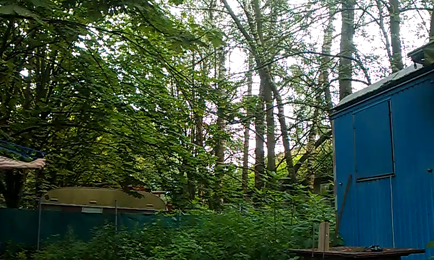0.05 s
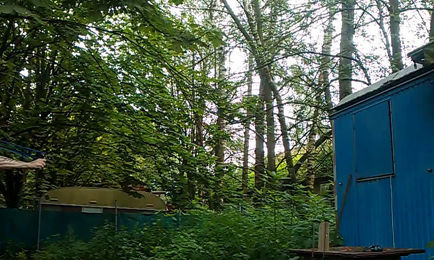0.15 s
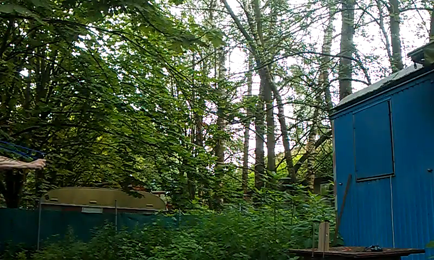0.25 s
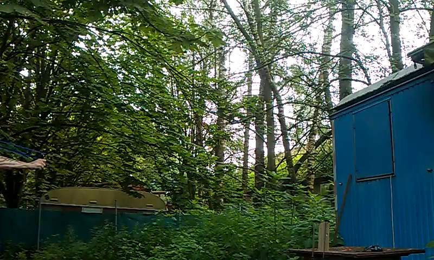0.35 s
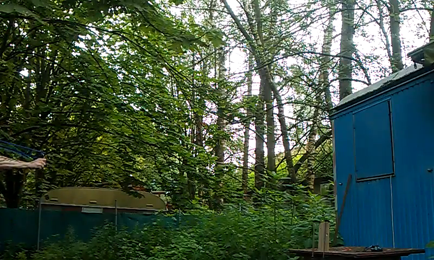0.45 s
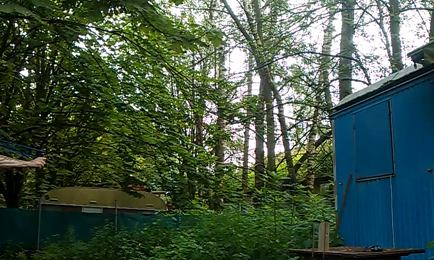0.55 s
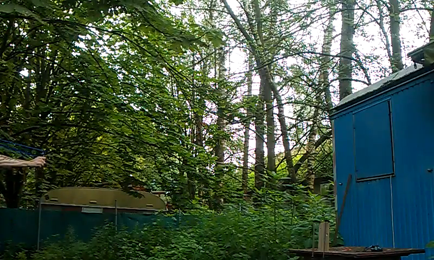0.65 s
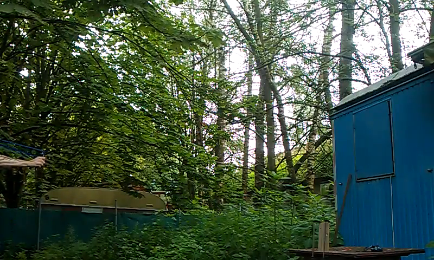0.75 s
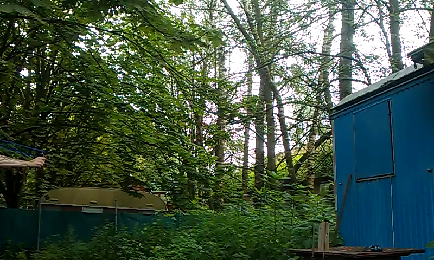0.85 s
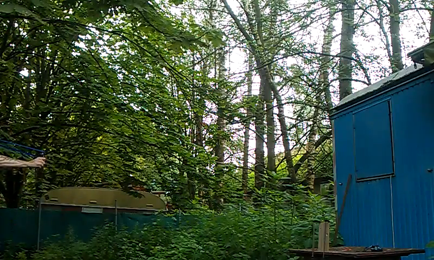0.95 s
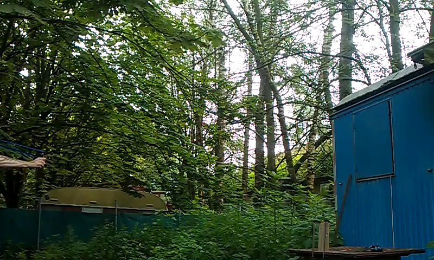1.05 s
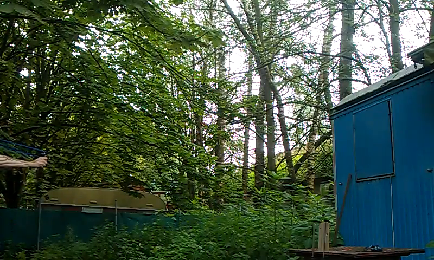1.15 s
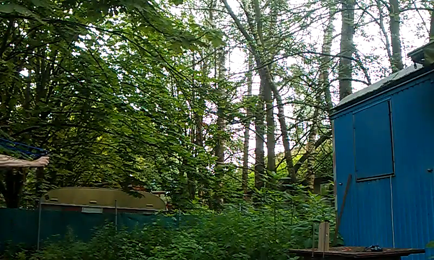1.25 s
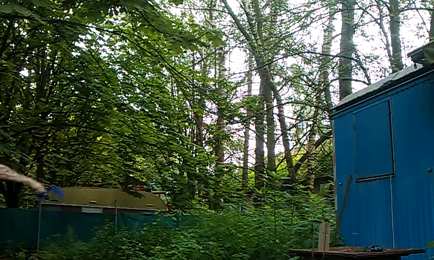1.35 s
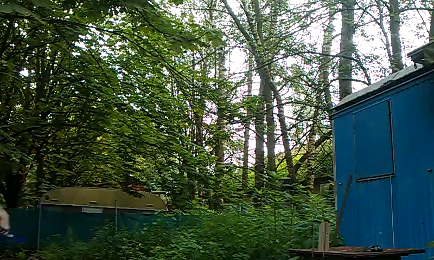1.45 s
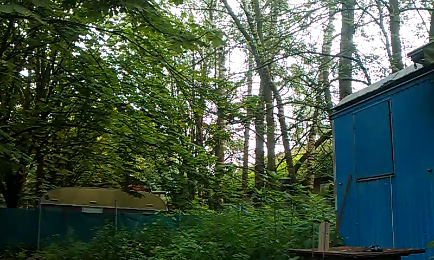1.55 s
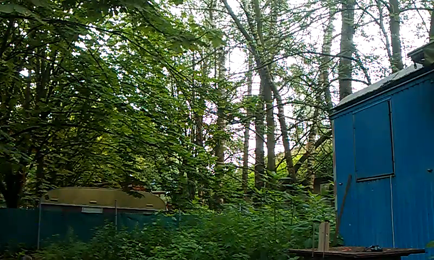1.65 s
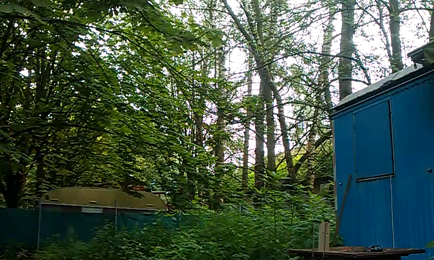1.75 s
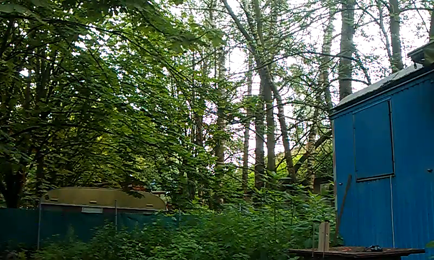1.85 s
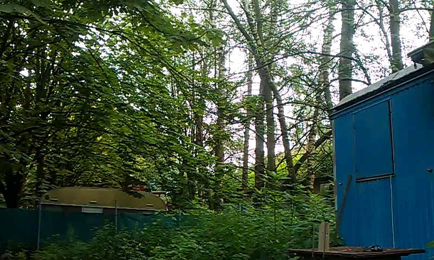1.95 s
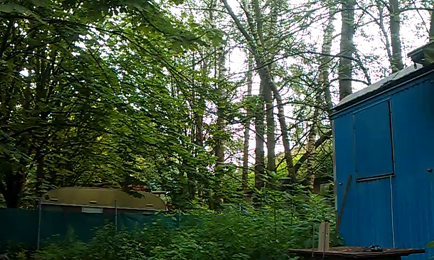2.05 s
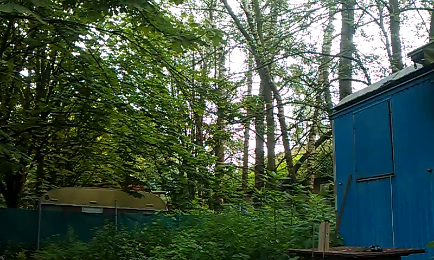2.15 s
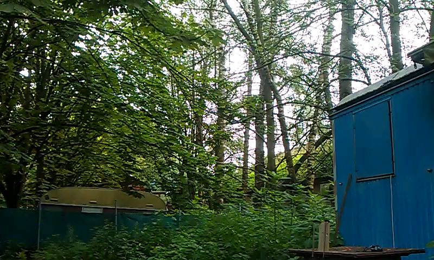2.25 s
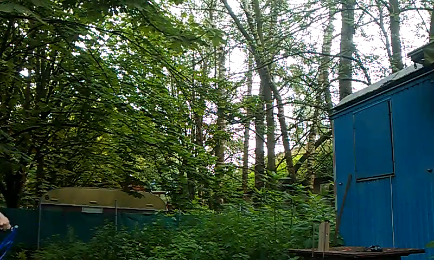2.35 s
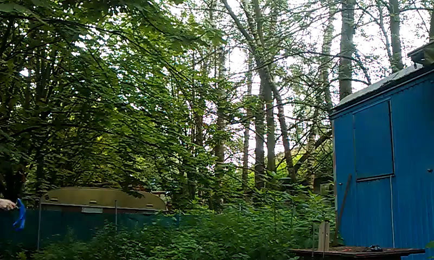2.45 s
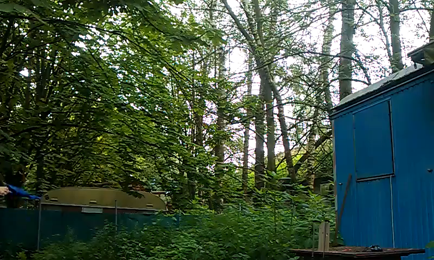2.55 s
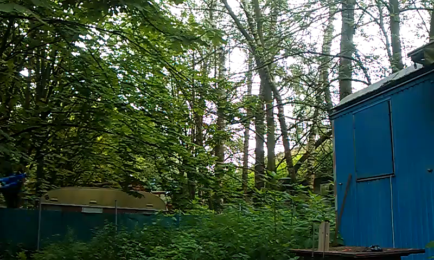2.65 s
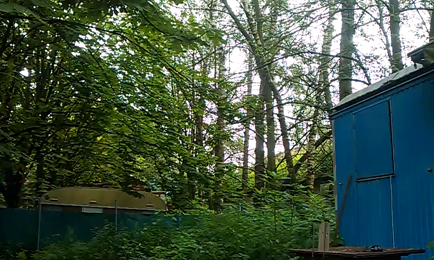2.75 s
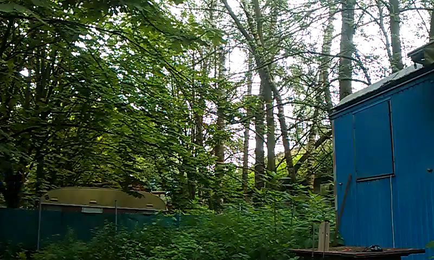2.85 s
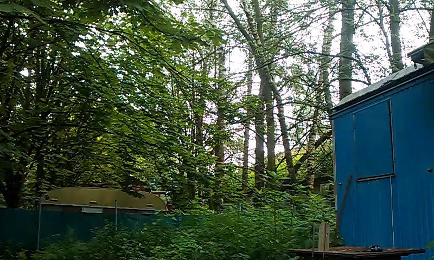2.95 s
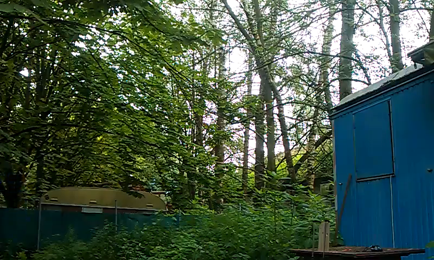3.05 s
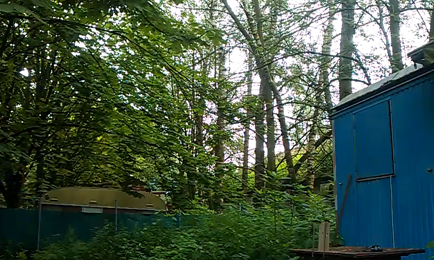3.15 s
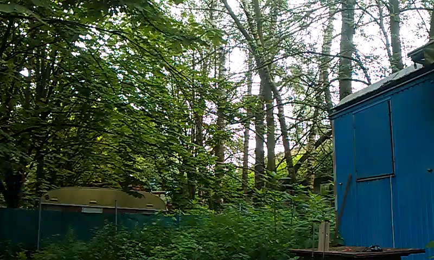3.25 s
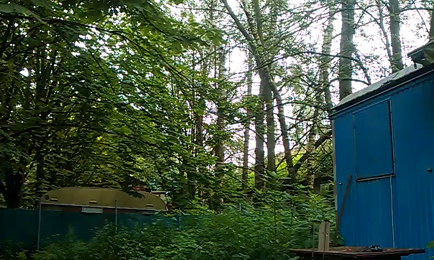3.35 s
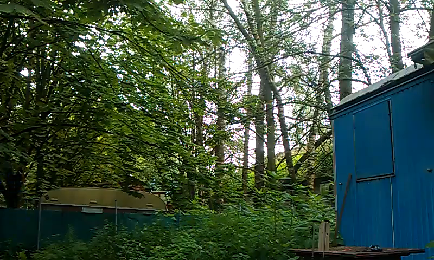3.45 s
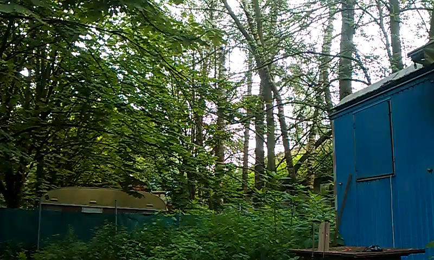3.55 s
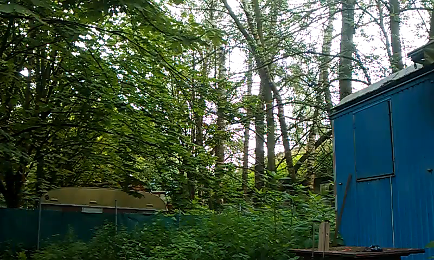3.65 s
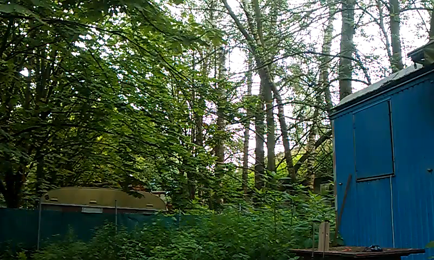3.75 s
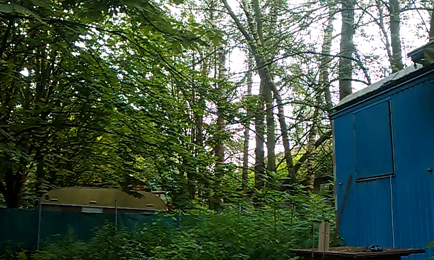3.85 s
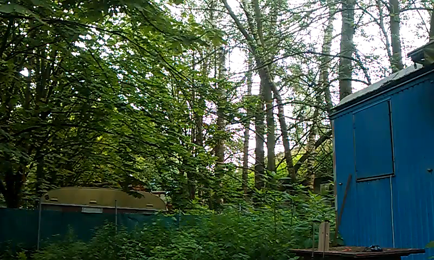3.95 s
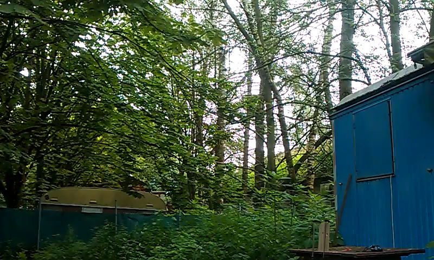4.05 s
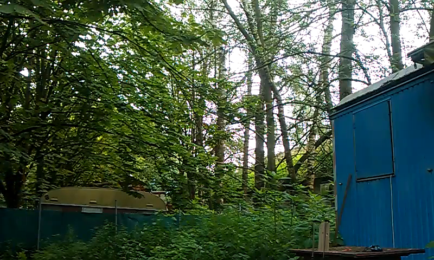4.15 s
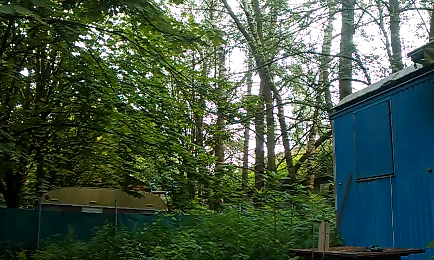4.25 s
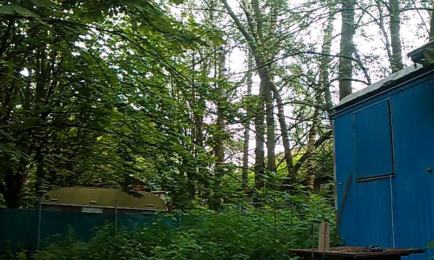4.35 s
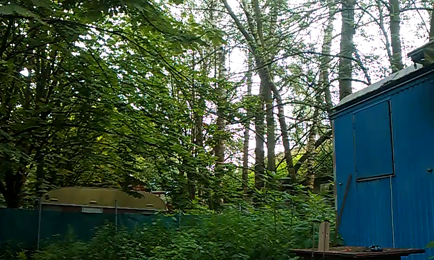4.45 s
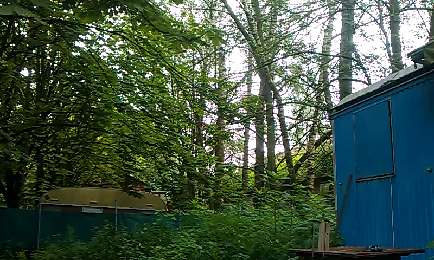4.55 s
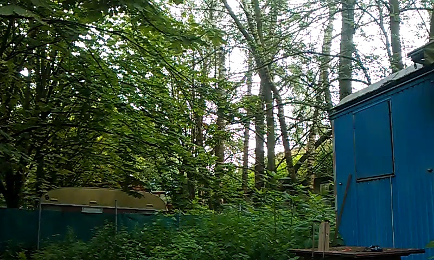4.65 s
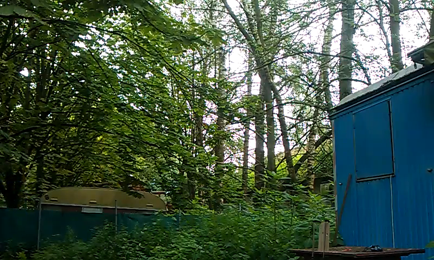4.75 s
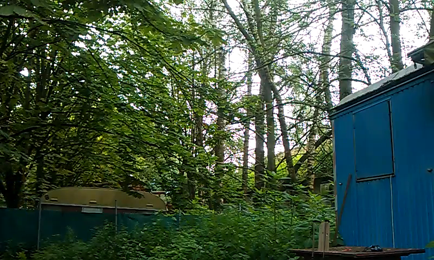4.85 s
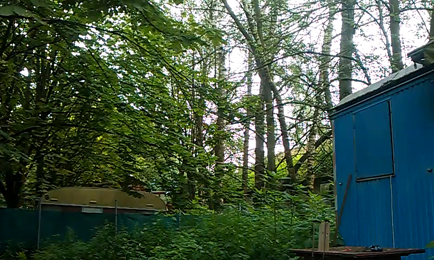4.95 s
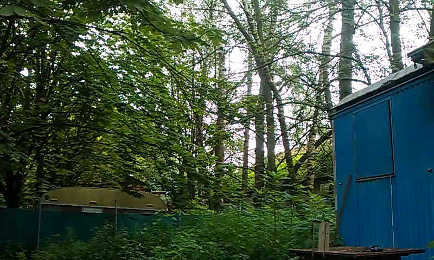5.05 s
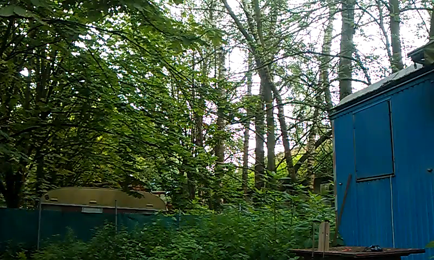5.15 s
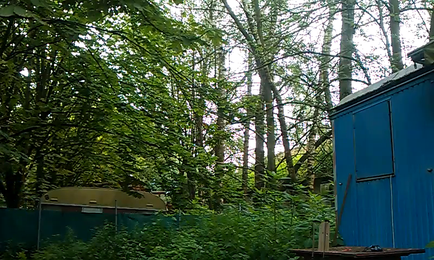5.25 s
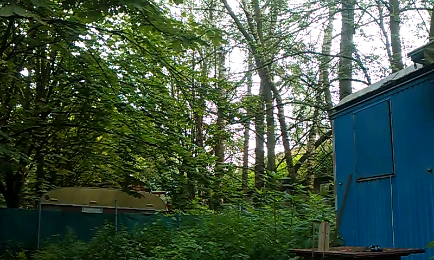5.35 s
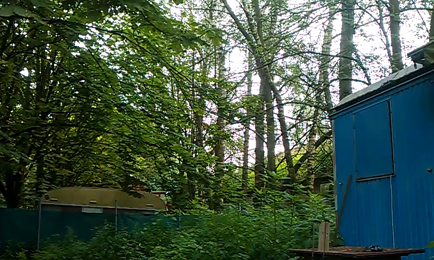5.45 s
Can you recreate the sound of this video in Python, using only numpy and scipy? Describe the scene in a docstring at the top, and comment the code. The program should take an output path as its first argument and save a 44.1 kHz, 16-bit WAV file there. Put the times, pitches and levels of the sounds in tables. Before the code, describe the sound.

Quiet birdsong and soft hiss, then one sharp rubbery slingshot snap with a tearing rush of leaves, a woodland echo, and more chirps.

```python
"""Thin bird whistles scoop and trill among the trees, over a noise bed of far rumble, soft air and high hiss.
At 1.4 s a slingshot is fired: its bands swish as fluttering noise, slap the fork with cracks, knocks and
decaying sine rings, and the shot tears into the leaves as a spray of ticks, with knocks of its own.
A limiter squeezes the shot and the trees echo it as a decaying noise tail. The far calls carry on, and at
3.2 s a bird close by chips with two sliding sine voices, while the rumble and air slowly swell."""
import sys
import numpy as np
from scipy import signal
from scipy.fft import rfft, irfft, next_fast_len
from scipy.io import wavfile
from scipy.ndimage import map_coordinates

SR = 44100
rng = np.random.default_rng(int(sys.argv[2]) if len(sys.argv) > 2 else 0)


def unload_audio(sound):
    """Save the sound as a 16-bit wav file, at the path given as the first command line argument."""
    columns = np.transpose(np.atleast_2d(sound))
    # keep every value between -1 and 1, then stretch to whole-number steps
    steps = np.round(np.clip(columns, -1, 1) * 32767)
    wavfile.write(sys.argv[1], SR, steps.astype(np.int16))


N = 242550
TIME = np.arange(N) / SR

# blows of the bands, then of the shot on twigs and wood:
# (t/s, crack level/dB, knock level/dB, knock f/Hz, knock t60/s)
BLOW_HITS = [(1.4154, -16, -24.5, 432, .045), (1.4526, -9.5, -19.5, 760, .089),
             (1.458, -19, -22, 1410, 0.071), (1.476, -20, -22.5, 750, 0.031), (1.531, -40, -27, 1580, .34),
             (1.5837, -14.5, -19.5, 636, .065), (1.742, -50, -47, 296, 0.078)]


def amp(db):
    """Decibels to gain."""
    return 10 ** (np.asarray(db) / 20)


def unit(x):
    """Scale to rms 1."""
    return x / np.sqrt(np.mean(x ** 2) + 1e-20)


def along(points, hz):
    """Read (f/Hz, value) points on a log frequency axis."""
    f, v = np.transpose(points)
    return np.interp(np.log(hz + 1), np.log(f), v)


def wobble(rate):
    """A smooth random curve with rate knots a second."""
    knots = rng.standard_normal(int(N * rate / SR) + 4)
    return map_coordinates(knots, [TIME * rate])


def filtered(x, response):
    """Shape the spectrum of x by a response given as a function of frequency."""
    size = next_fast_len(N + SR // 2)
    gain = response(np.fft.rfftfreq(size, 1 / SR))
    return irfft(rfft(x, size) * gain, size)[..., :N]


def coloured(x, colour):
    """Filter x by a colour curve, then scale to rms 1."""
    return unit(filtered(x, lambda hz: amp(along(colour, hz))))


def noise(colour):
    """Fresh coloured noise of rms 1."""
    return coloured(rng.standard_normal(N), colour)


def fade(t, t60):
    """Exponential decay, 60 dB down after t60 seconds."""
    return np.exp(-np.log(1000) * t / np.maximum(t60, 1e-3))


def burst(t, colour, t60):
    """Coloured noise that starts at about rms 1 and dies away."""
    decay = fade(t, t60)
    decaying_noise = unit(decay * noise(colour)[:len(t)])
    return decaying_noise * np.sqrt(np.mean(decay ** 2))


def envelope(start, attack, hold, fall_db_per_s, power=1, sag_db_per_s=0):
    """Gain that grows as a power of time, holds with an optional sag, then dies away."""
    t = np.maximum(TIME - start, 0)
    rise = np.clip(t / attack, 1e-9, 1) ** power
    sag_db = sag_db_per_s * np.maximum(t - attack, 0)
    fall_db = fall_db_per_s * np.maximum(t - attack - hold, 0)
    return rise * amp(-sag_db - fall_db)


def woods(x, build, stretch):
    """Trunks and leaves scatter sound back: the echo builds up, and its highest treble dies first."""
    # decay by band, before the stretch: (f/Hz, t60/s)
    wood_decay = [(100, 0.79), (500, 0.59), (1500, 0.98), (4500, 0.77), (8000, 0.67), (11000, 0.57),
                  (15000, 0.11)]
    hz, t, z = signal.stft(rng.standard_normal(SR), SR, nperseg=256)
    decay = fade(t, stretch * along(wood_decay, hz)[:, None])
    build_up = 1 - np.exp(-t / build)
    tail = signal.istft(z * decay * build_up, SR)[1]
    tail = tail / np.linalg.norm(tail)
    return signal.fftconvolve(x, tail)[:len(x)]


def background():
    """A far rumble and the soft rush of air creep up as the breeze freshens, under a nearly steady hiss."""
    # spectra of the three layers, relative density per Hz: (f/Hz, level/dB)
    rumble_colour = [(15, -33), (32, -1), (48, -6.5), (60, 0.5), (74, 2.5), (88, -6), (110, -19),
                     (250, -34.5)]
    air_colour = [(30, -25), (120, -3), (200, -6), (350, -4.5), (550, -2), (800, -2), (1050, 0.5),
                  (1350, -3), (1800, -3), (2300, -9), (4000, -11), (9000, -26)]
    hiss_colour = [(1000, -14), (3000, -14.5), (5000, -9.5), (6200, -9.5), (7200, -5.5), (8400, -0.5),
                   (9200, -5.5), (10000, -11.5), (11500, -18), (15500, -27.5)]
    # starting level in dB + growth in dB/s + random drift in dB
    rumble_db = -64 + 0.62 * TIME + 0.34 * wobble(5.7)
    air_db = -55 + 0.29 * TIME + 0.21 * wobble(4.63)
    hiss_db = -54.5 + 0.1 * wobble(4.1)
    rumble = amp(rumble_db) * noise(rumble_colour)
    air = amp(air_db) * noise(air_colour)
    hiss = amp(hiss_db) * noise(hiss_colour)
    return rumble + air + hiss


def faint_calls(count=8):
    """Fainter birds farther off call at random, once in each equal slot; same columns as the clear calls."""
    length_s, centre_hz, spread_hz, trill_hz, level_db = .06, 7260, 500, 180, -60.5
    found = []
    for slot, (when, pitch) in enumerate(rng.random((count, 2))):
        start_s = (slot + when) * N / SR / count
        pitch_hz = centre_hz + spread_hz * (2 * pitch - 1)
        found.append((start_s, length_s, pitch_hz, trill_hz, level_db))
    return found


def far_birds(knots_per_s=420, scoop=0.052, scoop_s=0.00528, direct_db=-1.5, echo_db=-1):
    """Thin whistles that scoop up to their pitch, slide and trill unevenly; each perch has its own echo."""
    # clear calls among the trees, level before the direct and echo gains:
    # (t/s, length/s, pitch f/Hz, trill scale/Hz, level/dB)
    clear_calls = [(.025, 0.057, 5120, 110, -54), (0.282, 0.048, 5080, 90, -52.5),
                   (0.712, .09, 7390, 300, -48), (0.792, 0.068, 6400, 300, -60),
                   (0.922, 0.076, 7020, 130, -57), (1.986, .04, 6970, 160, -50),
                   (2.161, 0.07, 8210, 281, -48.5), (2.56, 0.078, 7540, 400, -54),
                   (2.663, .063, 7710, 820, -48), (2.686, 0.055, 4315, 70, -49.5),
                   (2.815, .09, 6850, 70, -57), (2.894, 0.074, 7760, 40, -53),
                   (3.336, 0.042, 7830, 90, -50), (3.383, .16, 7200, 110, -53.5),
                   (3.617, 0.069, 6920, 230, -46.5), (4.08, .06, 7960, 300, -47.5),
                   (4.14, .08, 6900, 150, -57.5), (4.407, 0.065, 7550, 347, -52),
                   (4.486, .048, 7770, 390, -42.5), (4.675, 0.038, 7930, 450, -47.5),
                   (4.795, .05, 8500, 400, -51.5), (5.175, .05, 7040, 130, -56)]
    rise_hz, drop_per_trill = 169, 1.405  # a pure note rises a little; the harder the trill, the more it falls
    out = np.zeros(N + SR)
    for start_s, length_s, pitch_hz, trill_hz, level_db in clear_calls + faint_calls():
        u = np.linspace(0, 1, max(round(length_s * SR), 2))  # progress through the call
        t = u * length_s
        waver = map_coordinates(rng.uniform(-1.5, 1.5, 256), [t * knots_per_s], mode="mirror")
        slide_hz = rise_hz - drop_per_trill * trill_hz
        sliding_hz = pitch_hz + slide_hz * (u - .5)
        hz = sliding_hz * (1 - scoop * np.exp(-t / scoop_s)) + trill_hz * waver
        swell = np.sqrt(2 * np.abs(np.sin(np.pi * u)))
        whistle = amp(level_db) * swell * np.sin(2 * np.pi * np.cumsum(hz) / SR)
        note = np.pad(whistle, (0, SR - len(u)))  # room for the echo
        echo = unit(woods(note, build=0.0043, stretch=1.0)) * note.std()
        out[round(start_s * SR):][:SR] += amp(direct_db) * note + amp(echo_db) * echo
    return out[:N]


def near_bird(apart_hz=570, second_db=1.5, wall_delay_s=0.024, wall_db=-12, echo_db=-11):
    """A fast chip scoops up, then sags; the two sides of the syrinx beat against each other."""
    start_s, level_db = 3.196, -32
    aim_hz, scoop_hz, scoop_s, sag_hz_per_s = 8750, 4690, .0034, 13200  # the sag keeps it short of its aim
    t = np.maximum(TIME - start_s, 0)
    hz = aim_hz - scoop_hz * np.exp(-t / scoop_s) - sag_hz_per_s * t
    phase = 2 * np.pi * np.cumsum(hz) / SR
    second_voice = amp(second_db) * np.sin(phase - 2 * np.pi * apart_hz * t)
    voices = np.sin(phase) + second_voice
    swell = envelope(start_s, attack=0.0068, hold=.012, fall_db_per_s=1100, power=1.9)
    chip = amp(level_db) * swell * voices
    wall = amp(wall_db) * np.roll(chip, round(wall_delay_s * SR))  # off the shed
    return chip + wall + amp(echo_db) * woods(chip, build=.004, stretch=1.1)


def foliage(ticks_per_s=2500, spread_db=4, level_db=-20.5):
    """The shot meets ever thicker leaves, then stops: a dense spray of tiny ticks of uneven size."""
    # spectrum of the torn leaves, relative density per Hz: (f/Hz, level/dB)
    leaf_colour = [(60, -26), (200, -21), (450, -16), (800, -8.5), (1500, -5), (2050, -6), (2700, -6.5),
                   (4400, 0.5), (5600, 2), (7000, 0.5), (9100, -0.5), (10200, -18), (13000, -29),
                   (15500, -42)]
    tearing = envelope(1.438, attack=.21, hold=.04, fall_db_per_s=219, power=1.3)
    struck = rng.random(N) < ticks_per_s / SR
    sizes = rng.choice([-1, 1], N) * amp(spread_db * rng.standard_normal(N))
    return amp(level_db) * tearing * coloured(struck * sizes, leaf_colour)


def fork_ring(level_db=-9.5, attack_s=0.00047):
    """The first blow rings the fork with its slack bands: a sum of decaying sine modes."""
    # modes, level relative to the ring's own gain: (f/Hz, level/dB, t60/s)
    fork_modes = [(419, -10.5, 0.055), (556, -13.5, 0.056), (1590, -2, 0.033), (2290, -8, 0.045),
                  (2760, 2.5, 0.022), (2970, -1.5, 0.022), (3740, -7, 0.043), (5530, -4, 0.023)]
    out, t = np.zeros(N), np.arange(SR // 3) / SR
    ring = sum(amp(db) * fade(t, t60) * np.sin(2 * np.pi * hz * t) for hz, db, t60 in fork_modes)
    onset = 1 - np.exp(-t / attack_s)
    out[round(BLOW_HITS[0][0] * SR):][:len(t)] += amp(level_db) * onset * ring
    return out


def blows(crack_t60_s=0.032):
    """Each blow is a sharp noise crack and a dull noise knock at the pitch of what is hit."""
    # spectrum of a crack, relative density per Hz: (f/Hz, level/dB)
    crack_colour = [(100, -24), (700, 5), (1400, -17), (2000, -13), (3000, 7.5), (4500, 13), (6000, -1),
                    (8000, -8), (11000, -17), (15500, -20)]
    # spectrum of a knock, relative density per Hz: (multiple of its pitch, level/dB)
    knock_colour = [(.06, -33), (.25, -15.5), (.65, -6.5), (1, 3.5), (1.3, -7), (2.2, -13.5), (4, -11.5),
                    (12, -55)]
    out, t = np.zeros(N), np.arange(SR // 3) / SR
    for start_s, crack_db, knock_db, knock_hz, knock_t60_s in BLOW_HITS:
        crack = amp(crack_db) * burst(t, crack_colour, crack_t60_s)
        pitched_colour = [(multiple * knock_hz, db) for multiple, db in knock_colour]
        knock = amp(knock_db) * burst(t, pitched_colour, knock_t60_s)
        out[round(start_s * SR):][:len(t)] += crack + knock
    return out


def bands(level_db=-16.5, flutter_db=1.25, flutter_knots_per_s=400):
    """Rubber bands are let go, speed up, flap on with a quick flutter while weakening, and come to rest."""
    # spectrum of air rushing past bands and pouch, relative density per Hz: (f/Hz, level/dB)
    swish_colour = [(40, -37), (200, -26), (450, -21), (800, -13), (1550, -10.5), (2000, -14), (2750, -6),
                    (6000, -8), (7100, -2.5), (7900, -0.5), (8700, 3), (9400, -4), (10300, -9.5),
                    (12500, -12), (15500, -21)]
    swing = envelope(1.402, attack=.027, hold=.21, fall_db_per_s=238, power=1.25, sag_db_per_s=10)
    flutter = amp(level_db + flutter_db * wobble(flutter_knots_per_s))
    return swing * flutter * noise(swish_colour)


def scene():
    """The shot and its echo, birds and background, alike in both channels."""
    shot = bands() + blows() + fork_ring() + foliage()
    echo = unit(woods(shot, build=0.017, stretch=0.95)) * shot.std()
    yard = shot + amp(-9) * echo + near_bird() + far_birds() + background()
    return np.array([yard, yard])


def record(dry, ceiling_db=-17.5, window_s=0.0019, top=0.37, hardness=3.1, top_hz=15800):
    """A quick rms limiter holds the shot down, first peaks slip past and soft-clip, and a steep low-pass ends it."""
    keep = np.exp(-1 / (window_s * SR))
    power = signal.lfilter([1 - keep], [1, -keep], dry ** 2)
    over = np.sqrt(np.abs(power)) / amp(ceiling_db)
    held = dry / np.maximum(over, 1)
    clipped = held / (1 + np.abs(held / top) ** hardness) ** (1 / hardness)
    return filtered(clipped, lambda hz: 1 / (1 + (hz / top_hz) ** 400))


dry = scene()
out = record(dry)
unload_audio(out)
```